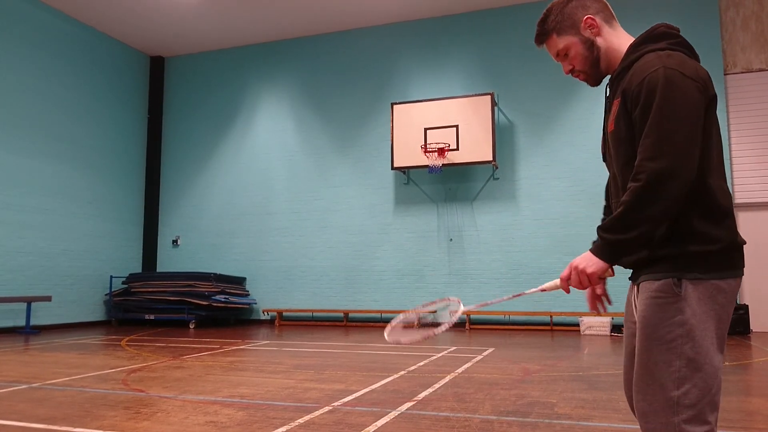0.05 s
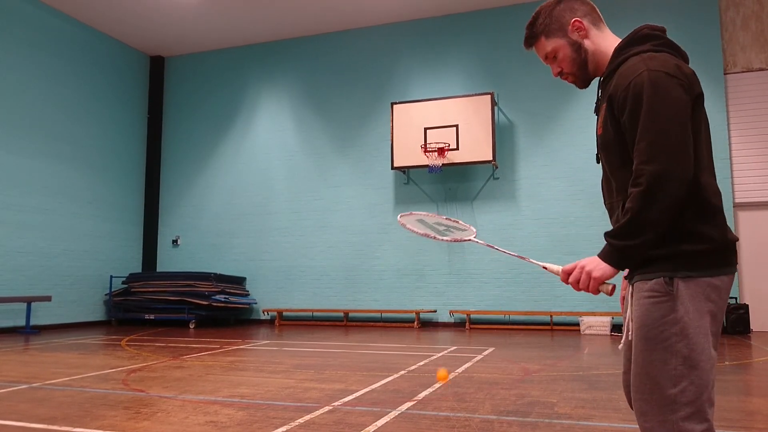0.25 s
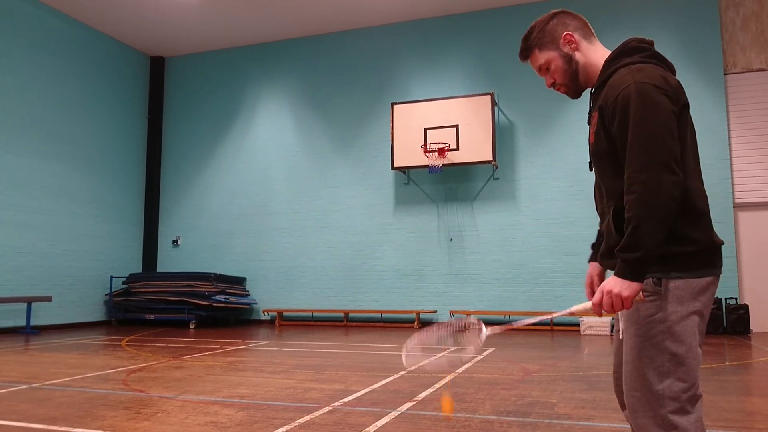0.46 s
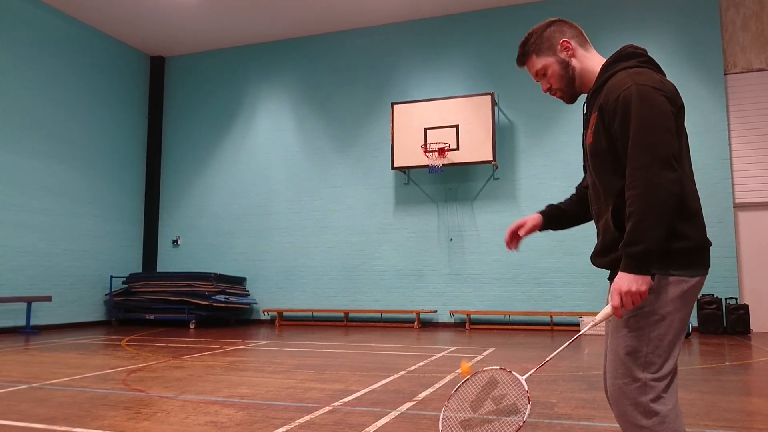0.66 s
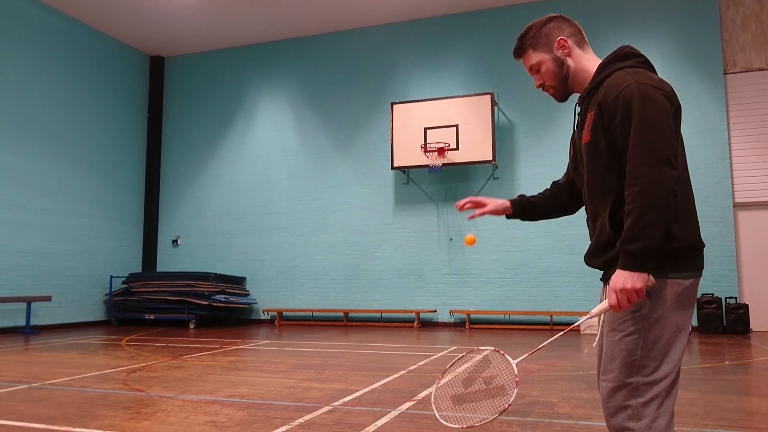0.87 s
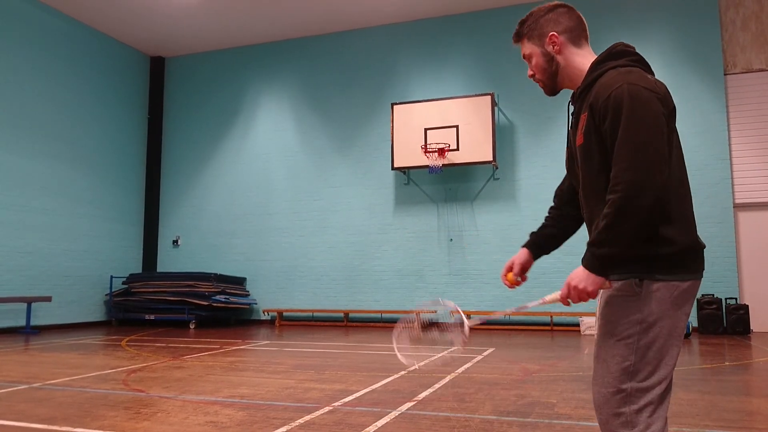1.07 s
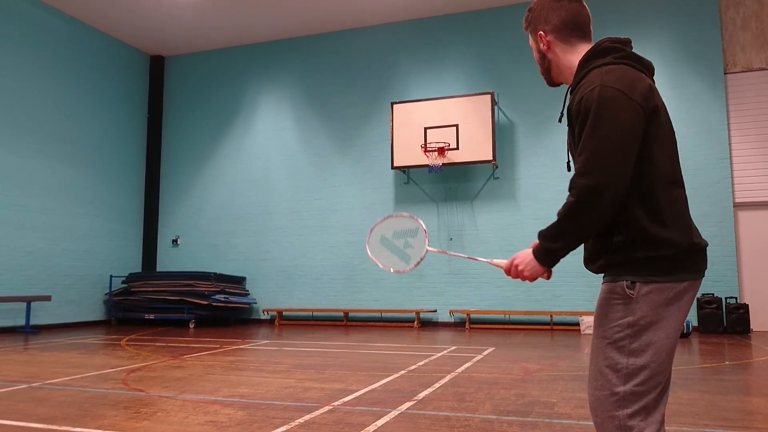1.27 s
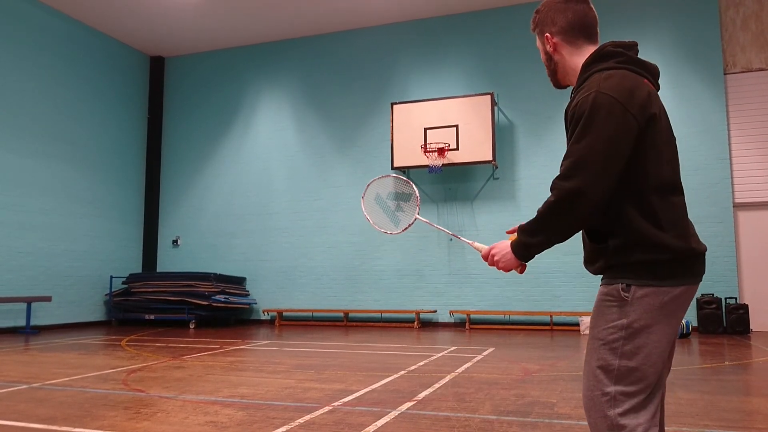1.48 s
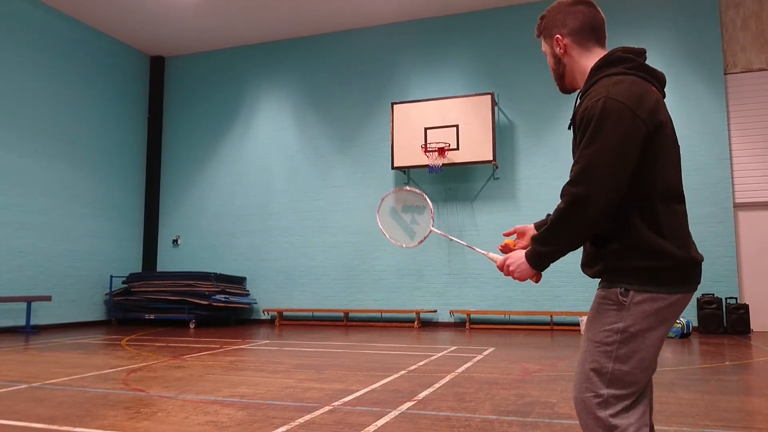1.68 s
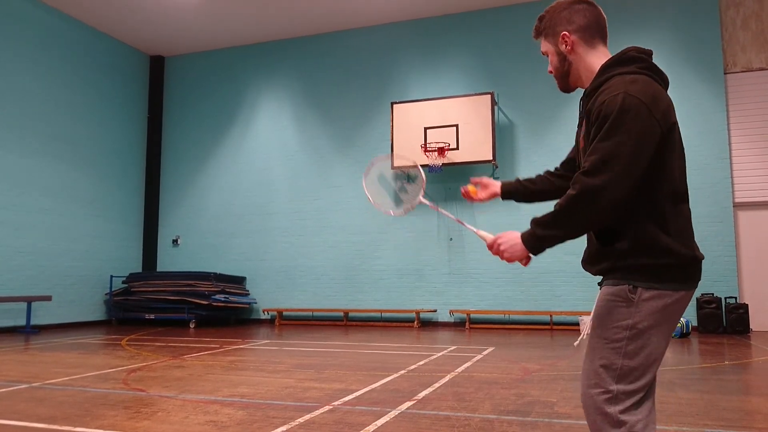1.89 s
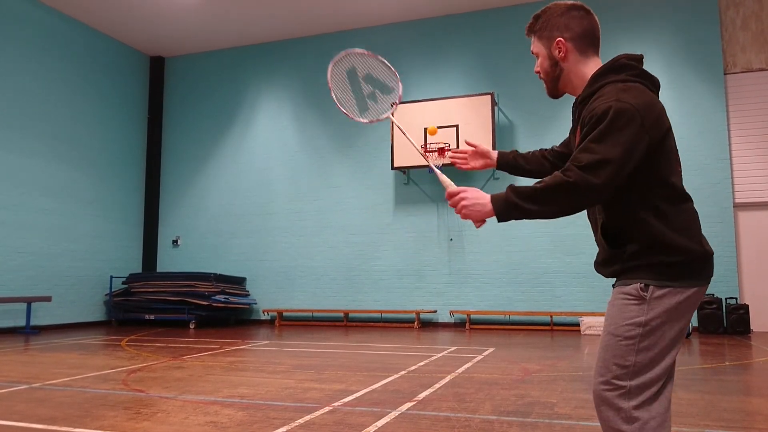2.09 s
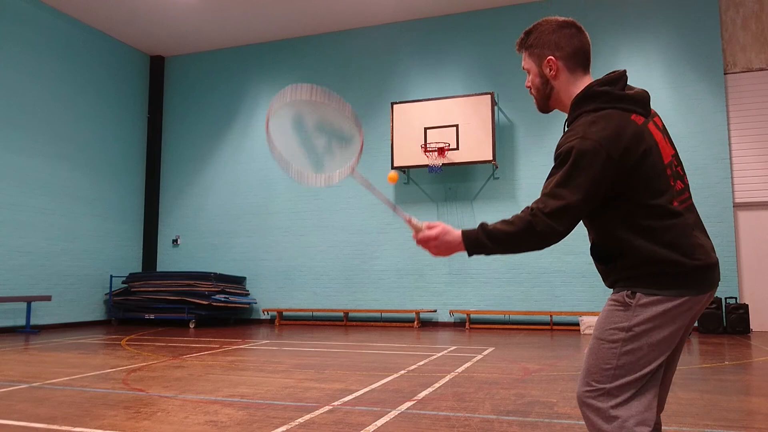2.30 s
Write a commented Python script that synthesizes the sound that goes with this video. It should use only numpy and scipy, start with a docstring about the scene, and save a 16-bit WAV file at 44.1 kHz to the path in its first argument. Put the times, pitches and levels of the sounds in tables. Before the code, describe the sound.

A small hollow ball bounces twice on a wooden floor in an echoing sports hall.

```python
"""A soft knock on the sprung wooden floor of a big sports hall: a light hollow ball bounces. A racket taps
it, it bounces again, hard, and it ticks as it is caught. Each bounce knocks the boards and rings the
shell; the player's steps thump the floor. The walls throw back a few slaps and a long wash over faint
ventilation. Two microphones stand close together; the right is duller in the middle range, both hiss."""
import sys
import numpy as np
from scipy import signal
from scipy.fft import rfft, irfft, next_fast_len
from scipy.io import wavfile

SR = 44100
rng = np.random.default_rng(int(sys.argv[2]) if len(sys.argv) > 2 else 0)


def wrap_up_sound(samples):
    """Save the sound to the file named by the first command line argument, as 16-bit audio."""
    columns = np.atleast_2d(samples).T
    # keep every value between -1 and 1, then stretch to whole-number steps
    tamed = np.clip(columns, -1, 1)
    steps = np.round(tamed * 32767).astype(np.int16)
    wavfile.write(sys.argv[1], SR, steps)


N = 108045


def amp(db):
    """Decibels as an amplitude factor."""
    return 10 ** (np.asarray(db) / 20)


def unit(x):
    """x scaled to an RMS of one."""
    return x / np.sqrt(np.mean(x ** 2) + 1e-20)


def along(points, hz):
    """The curve through (Hz, value) points, read at hz on a log axis."""
    freqs, values = np.transpose(points)
    return np.interp(np.log(hz + 1), np.log(freqs + 1), values)


def since(start):
    """Seconds since start, zero before."""
    return np.maximum(np.arange(N) / SR - start, 0)


def decay(age, t60):
    """An envelope that falls 60 dB in t60 seconds."""
    return np.exp(-np.log(1000) * age / t60)


def filtered(x, response):
    """x through a complex response of frequency."""
    size = next_fast_len(N + SR)
    return irfft(rfft(x, size) * response(np.fft.rfftfreq(size, 1 / SR)), size)[..., :N]


def coloured(x, colour):
    """x through a curve of (Hz, dB) points."""
    return filtered(x, lambda hz: amp(along(colour, hz)))


def convolved(x, response):
    """x through an impulse response, per channel."""
    return signal.fftconvolve(np.atleast_2d(x), np.atleast_2d(response), axes=1)[:, :N]


def pulse(start, colour, size=8192):
    """One blow with the given (Hz, dB) colour."""
    cepstrum = irfft(np.log(amp(along(colour, np.fft.rfftfreq(size, 1 / SR)))))
    cepstrum[1:size // 2] *= 2  # minimum phase: nothing sounds before the blow
    cepstrum[size // 2 + 1:] = 0
    blow = irfft(np.exp(rfft(cepstrum)))
    return np.pad(blow, (round(start * SR), N))[:N]


def ring(start, hz, t60):
    """One struck mode: a dying sine."""
    age = since(start)
    return np.sin(2 * np.pi * hz * age) * decay(age, t60)


def chatter(x, t60, db):
    """x smeared by many short-lived resonances."""
    burst = rng.standard_normal(N) * decay(since(0), t60)
    return amp(db) * convolved(x, burst / np.linalg.norm(burst))[0]


def echoes(x, paths):
    """Delayed, weaker copies of x, one for each (seconds, dB) path."""
    return sum(amp(db) * np.pad(x, (round(delay * SR), 0))[:N] for delay, db in paths)


def direct(x, lag_s=.00004):
    """Sound from the front reaches the right microphone a shade later."""
    return np.array([x, filtered(x, lambda hz: np.exp(-2j * np.pi * hz * lag_s))])


# The hall across the microphone pair. Each row: frequency in Hz, left-right correlation from -1 to 1.
PAIR_LIKENESS = [(60, .95), (125, 0.81), (250, 0.4), (500, 0.37), (1200, -0.12), (4000, -0.061),
                 (9000, 0.35), (14000, -.3)]

def diffuse():
    """White noise as two close microphones hear it in the hall."""
    def mid_side_gains(hz):
        angle = np.arccos(along(PAIR_LIKENESS, hz)) / 2
        return np.array([np.cos(angle), np.sin(angle)])
    mid, side = filtered(rng.standard_normal((2, N)), mid_side_gains)
    return np.array([mid + side, mid - side])


# Ventilation rumble, all round the microphones. Each row: frequency in Hz, relative level in dB.
VENT_RUMBLE = [(20, -8), (33, -1), (48, 4.5), (70, 0.5), (130, -15), (250, -16.5), (450, -26),
               (1000, -32.5), (3000, -40)]
# Its hum, in the centre. Each row: frequency in Hz, RMS level in dB.
VENT_HUM = [(97, -72.5), (194, -86.5)]

def ventilation(rumble_db=-64.5):
    """The ventilation rumbles and hums steadily."""
    hum = sum(amp(db) * np.sqrt(2) * np.sin(2 * np.pi * (hz * since(0) + rng.random()))
              for hz, db in VENT_HUM)
    return amp(rumble_db) * unit(coloured(diffuse(), VENT_RUMBLE)) + hum


# Sound still hanging in the hall at the start. Each row: frequency in Hz, relative level in dB.
LINGERING_COLOUR = [(60, 8), (200, -27), (400, 9), (700, -3.5), (1100, 12), (1700, -2.5), (3500, -8),
                    (8000, -13)]

def lingering_wash(start_db=-61, fall_db_per_s=8.5):
    """The faint wash of an earlier bounce fades away."""
    return amp(start_db - fall_db_per_s * since(0)) * unit(coloured(diffuse(), LINGERING_COLOUR))


# The big hall's tail, from all sides. Each row: frequency in Hz, gain in dB.
TAIL_COLOUR = [(60, 15.5), (170, 8), (450, 11.5), (1100, 14), (3000, 8), (6000, 5), (10000, 6), (12000, 3),
               (15000, -6)]
# How long it holds. Each row: frequency in Hz, seconds before it starts to die away.
TAIL_HOLD = [(100, 0.086), (400, 0.15), (1100, 0.27), (3500, 0.22), (9000, 0.057), (14000, 0.036)]
# How it dies. Each row: frequency in Hz, seconds to fall 60 dB.
TAIL_T60 = [(60, 2.5), (150, 1.65), (400, 2.13), (750, 2.1), (1100, 1.81), (1600, 1.77), (3000, 1.74),
            (6000, 1.64), (10000, 0.92), (15000, 0.68)]

def wash(x, gap_s=.016, build_s=0.0059):
    """The hall's reverberation builds up, holds and dies away, the treble first."""
    hz, t, spectrum = signal.stft(diffuse(), SR, nperseg=512)
    hz = hz[:, None]
    age = np.maximum(t - along(TAIL_HOLD, hz), 0)
    gain = amp(along(TAIL_COLOUR, hz)) * decay(age, along(TAIL_T60, hz))
    tail = signal.istft(spectrum * gain, SR, nperseg=512)[1][:, :N]
    build_up = 1 - np.exp(-since(gap_s) / build_s)
    return convolved(x, tail * build_up / np.sqrt(SR))


# Paths by way of the walls, shortest first. Each row: delay in seconds, gain in dB.
WALL_PATHS = [(0.026, -11), (.0299, -13), (.055, -19), (.063, -15), (.111, -18), (.157, -21), (.226, -17)]

def wall_slaps(x, wall_dull_hz=11300, air_db_per_s=43, air_hz=10000):
    """Echoes off the walls, weaker on the right; the longer the path, the more treble the air takes."""
    slaps = np.zeros(N)
    for delay, db in WALL_PATHS:
        def dulling(hz):
            air_loss_db = air_db_per_s * delay * (hz / air_hz) ** 2
            return amp(-air_loss_db) / (1 + 1j * hz / wall_dull_hz)
        slaps += filtered(echoes(x, [(delay, db)]), dulling)
    return slaps * amp([[0], [-3]])


# A low ring, mostly at the right microphone. Each row: pitch in Hz, relative level in dB, t60 in seconds.
STAND_MODES = [(134.8, -8, 0.96), (216.5, 4.5, 0.2), (372.3, 3.5, 0.37), (455, -17, 0.17)]

def stand_ring(delay_s=.017, level_db=-46):
    """Each bounce travels through the boards and sets off a low ring, perhaps of a shaken stand."""
    modes = sum(amp(knock_db + db) * ring(start + delay_s, hz, t60)
                for start, knock_db, *_ in BALL_BOUNCES for hz, db, t60 in STAND_MODES)
    return amp(level_db) * modes * amp([[-5], [3]])


# Ball and feet landing out on the floor. Each row: start in seconds, boom level in dB, base pitch in Hz,
# base t60 in seconds, thud level in dB.
FLOOR_THUMPS = [(0.231, -47.5, 69, 0.36, -13.5), (0.372, -44.5, 84.2, 0.21, 8), (0.677, -42.5, 70, 0.17, 6),
                (0.921, -41, 64.74, 0.96, 7.5), (1.407, -58.5, 100.5, 0.39, 7)]
# The boards' modes. Each row: ratio to the base pitch, relative level in dB, ratio to the base t60.
FLOOR_MODES = [(.74, -17, 0.52), (1, 1, 0.75), (1.42, -8.5, 1.6)]
# The dull thud of a landing. Each row: frequency in Hz, relative level in dB.
THUD_COLOUR = [(25, -58), (50, -5), (85, 1.5), (150, 0.5), (230, -6.5), (400, -17.5), (1000, -33.5),
               (4000, -48.5)]

def floor_thumps():
    """The sprung floor gives under ball and feet, booms and sends a dull thud round the hall."""
    boom = sum(amp(boom_db + mode_db) * ring(start, hz * pitch_ratio, t60 * t60_ratio)
               for start, boom_db, hz, t60, _ in FLOOR_THUMPS
               for pitch_ratio, mode_db, t60_ratio in FLOOR_MODES)
    thuds = [amp(thud_db) * pulse(start, THUD_COLOUR) for start, *_, thud_db in FLOOR_THUMPS]
    return boom + chatter(sum(thuds), t60=0.11, db=-9) + amp(-5) * sum(wash(thud) for thud in thuds)


# The racket's tap, then the catch, close to the microphones. Each row: start in seconds, click level
# in dB, racket ring level in dB.
BALL_TAPS = [(0.5242, -20.5, -57), (1.0245, -26, -88)]
# The ball's bright click. Each row: frequency in Hz, relative level in dB.
CLICK_COLOUR = [(300, -52), (2000, -6), (6000, 0.5), (9000, -3), (12000, 0.5), (15000, -9)]
# The racket's modes. Each row: pitch in Hz, relative level in dB, t60 in seconds.
RACKET_MODES = [(2987, 2, 0.23), (4990, -7, 0.39), (5700, 6.5, 0.15), (6500, -14, 0.13), (7079, -3, 0.25),
                (8400, -4, 0.13)]

def taps():
    """Light touches click the ball; the racket rings on when it is what touches."""
    clicks = sum(amp(click_db) * pulse(start, CLICK_COLOUR) for start, click_db, _ in BALL_TAPS)
    racket = sum(amp(ring_db + db) * ring(start, hz, t60)
                 for start, _, ring_db in BALL_TAPS for hz, db, t60 in RACKET_MODES)
    close = direct(chatter(clicks, t60=0.039, db=1) + racket)
    return close + amp(1) * wash(clicks + amp(-6) * racket)


# The ball meeting the wood. Each row: frequency in Hz, relative level in dB when soft and when hard.
KNOCK_COLOUR = [(40, -16, -17), (89, 4.5, 1.5), (200, 5.5, 2.5), (390, 7.5, 5), (810, 2.5, 1),
                (1070, 6.5, 6.5), (1470, 0, 0.5), (2270, -1, -2.5), (2360, -9, -4.5), (3460, -8, 1),
                (4260, -9, -7.5), (7650, -17, -8.5), (12500, -22, -19), (15800, -25, -36)]

def board_knock(start, hardness):
    """The ball's blow on the boards, brighter when it lands hard."""
    colour = [(hz, soft + hardness * (hard - soft)) for hz, soft, hard in KNOCK_COLOUR]
    return -pulse(start, colour)


# The hollow ball's modes. Each row: pitch in Hz, relative level in dB when soft and when hard,
# t60 in seconds.
SHELL_MODES = [(8874, -5.5, -11.5, 0.0066), (9740, -11.5, -9, 0.0071), (10020, -8, -6, 0.0068),
               (11240, -4.5, -5.5, 0.0036), (12920, -3.5, -12.5, 0.0043), (14200, -10, -18.5, .004),
               (5930, -33, -33, .05), ]

def shell_ring(start, hardness):
    """The shell rings high and very briefly, its modes alternating in sign."""
    return -sum((-1) ** k * amp(soft + hardness * (hard - soft)) * ring(start, hz, t60)
                for k, (hz, soft, hard, t60) in enumerate(SHELL_MODES))


# The two bounces, in front of the microphones. Each row: start in seconds, knock level in dB, shell
# level in dB, hardness from 0 to 1, gain into the hall in dB.
BALL_BOUNCES = [(0.2142, -10, -24.5, 0.08, 4.5), (0.6616, -1.5, -10.5, 0.99, 1.5)]
# Reflections off surfaces close by. Each row: delay in seconds, gain in dB.
NEAR_PATHS = [(.0007, -14), (.0021, -11), (.003, -20.5)]

def bounces():
    """Each bounce knocks the boards and rings the shell; boards, walls and hall answer."""
    hits, hall = np.zeros(N), np.zeros((2, N))
    for start, knock_db, shell_db, hardness, hall_db in BALL_BOUNCES:
        hit = amp(knock_db) * board_knock(start, hardness) + amp(shell_db) * shell_ring(start, hardness)
        hits += hit
        hall += amp(hall_db) * wash(hit)
    boards = chatter(hits, t60=0.097, db=2.5)
    boards = filtered(boards, lambda hz: 1j * hz / (200 + 1j * hz) / (1 + 1j * hz / 900))  # 200-900 Hz
    return direct(hits + boards + echoes(hits, NEAR_PATHS)) + wall_slaps(hits) + hall


def scene():
    """Everything in the hall, as it arrives at the microphone pair."""
    return bounces() + stand_ring() + taps() + floor_thumps() + ventilation() + lingering_wash()


# The right microphone, dull in the middle range. Each row: frequency in Hz, gain in dB.
RIGHT_RESPONSE = [(60, -5), (180, -3), (450, -9.5), (750, -12.5), (1150, -16.5), (2500, -11.5),
                  (5800, -7.5), (7200, -22), (8300, -1), (9000, -17), (10000, -9.5), (11200, 4), (12000, 7),
                  (13500, 3)]
# Preamplifier hiss on both sides. Each row: frequency in Hz, relative level in dB.
HISS_COLOUR = [(200, -3.5), (600, 3), (1500, -6), (4000, -1.5), (8000, -5), (12000, -7), (15500, -6.5)]
# The right microphone's resonance in its hiss. Each row: frequency in Hz, gain in dB.
RIGHT_HISS_PEAK = [(10600, 0), (11200, 10.5), (11900, -2)]
# The top of the treble rolling off on both sides. Each row: frequency in Hz, gain in dB.
TREBLE_ROLL_OFF = [(13000, 0.5), (14800, -0.5), (15600, -7)]
PORT_HZ, PORT_WIDTH_HZ = 10400, 4000
LOW_CUT_HZ, TOP_HZ, HISS_DB = 45.4, 15700, -69

def record(dry):
    """A duller right microphone, port resonance, a low cut, preamplifier hiss and the band limit."""
    mics = np.array([dry[0], coloured(dry[1], RIGHT_RESPONSE)])
    # The ports' resonance turns only the phase, which smears sharp clicks.
    mics = filtered(mics, lambda hz: np.exp(-2j * np.arctan2(hz * PORT_WIDTH_HZ, PORT_HZ ** 2 - hz ** 2)))
    mics = filtered(mics, lambda hz: 1 - 1 / (1 + (hz / LOW_CUT_HZ) ** 6))
    left_hiss, right_hiss = coloured(rng.standard_normal((2, N)), HISS_COLOUR)
    hiss = unit(np.array([left_hiss, coloured(right_hiss, RIGHT_HISS_PEAK)]))
    mics += amp(HISS_DB) * hiss
    return filtered(mics, lambda hz: amp(along(TREBLE_ROLL_OFF, hz)) * (hz < TOP_HZ))


dry = scene()
out = record(dry)
wrap_up_sound(out)
```